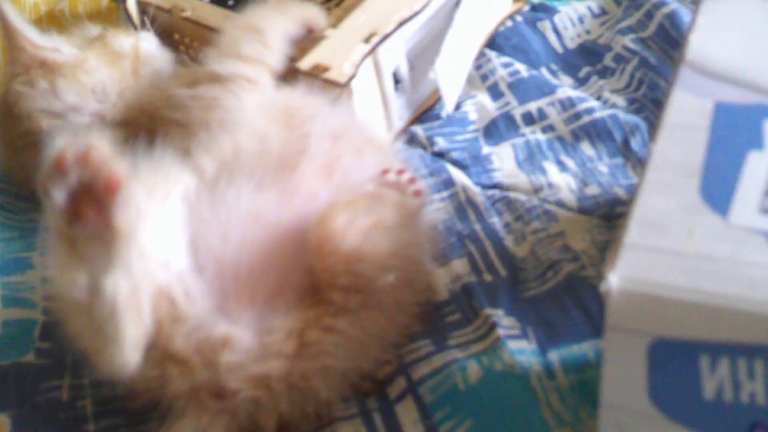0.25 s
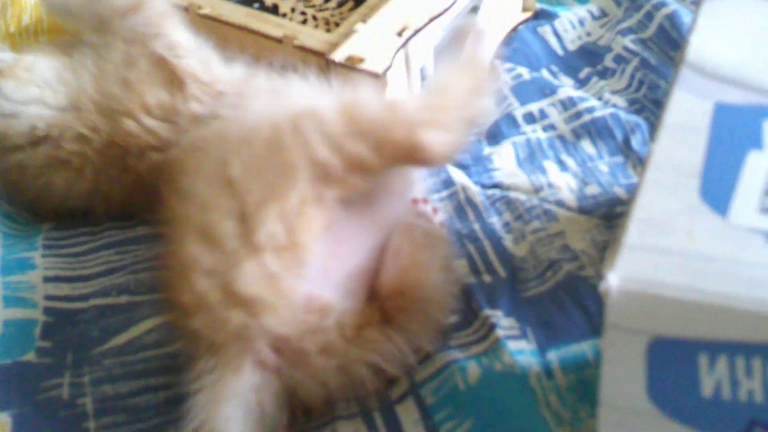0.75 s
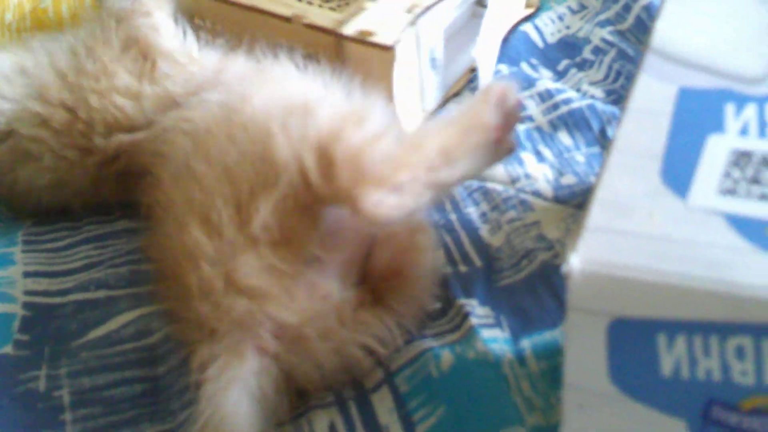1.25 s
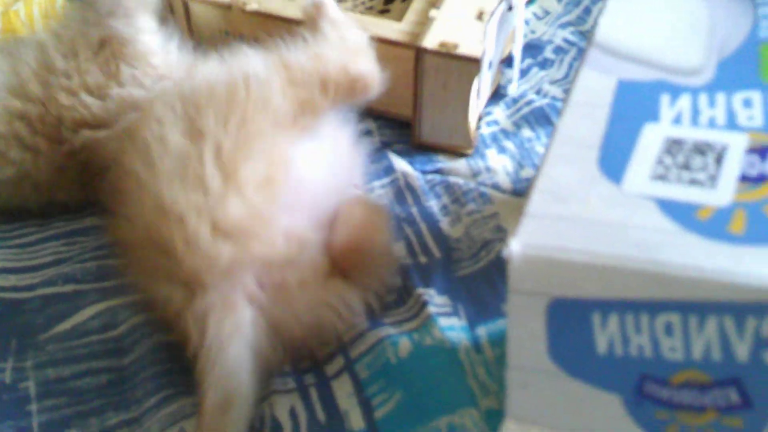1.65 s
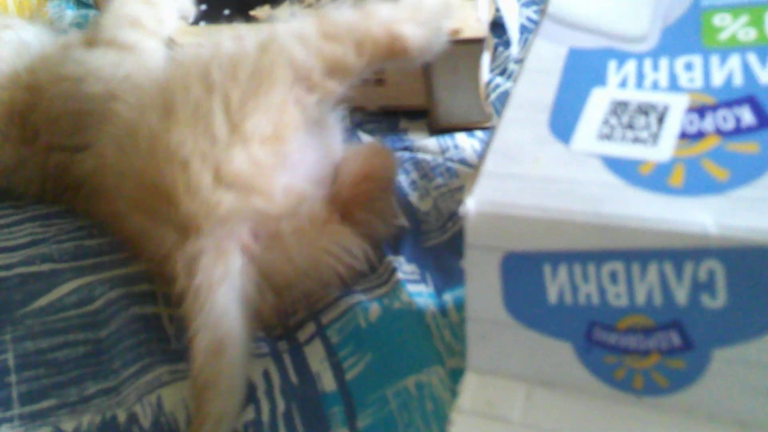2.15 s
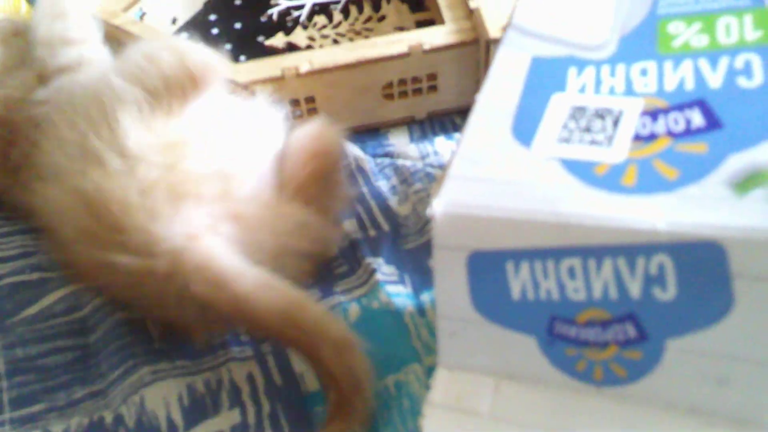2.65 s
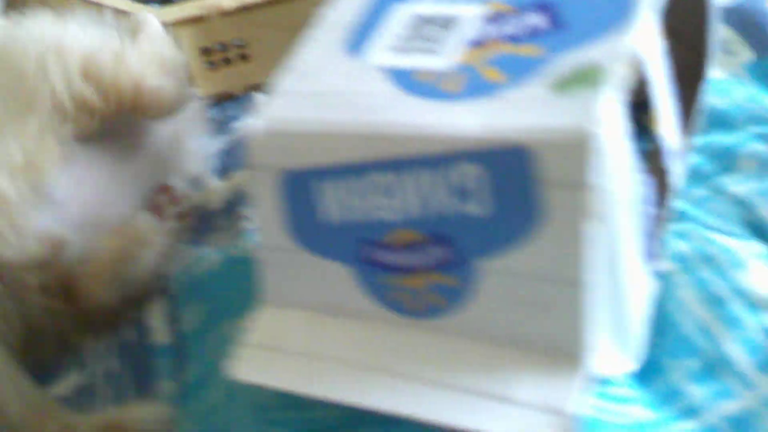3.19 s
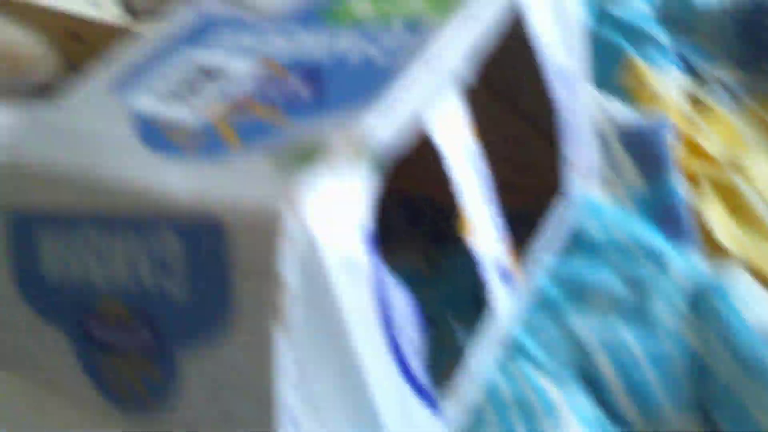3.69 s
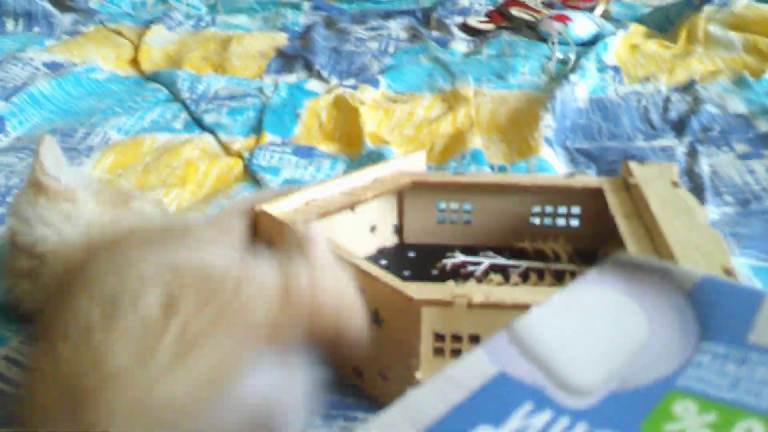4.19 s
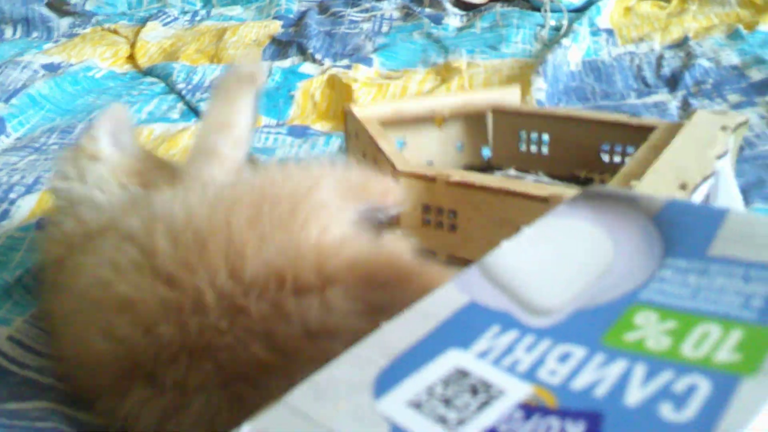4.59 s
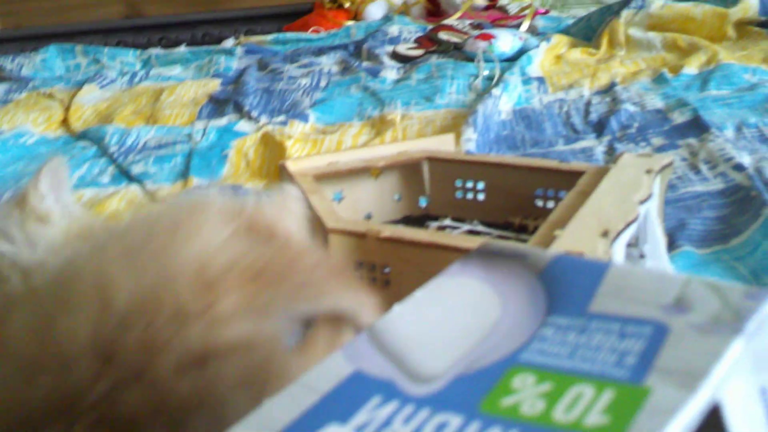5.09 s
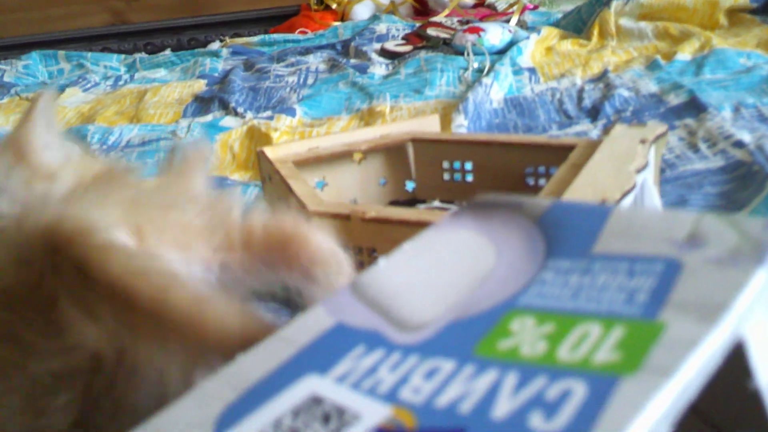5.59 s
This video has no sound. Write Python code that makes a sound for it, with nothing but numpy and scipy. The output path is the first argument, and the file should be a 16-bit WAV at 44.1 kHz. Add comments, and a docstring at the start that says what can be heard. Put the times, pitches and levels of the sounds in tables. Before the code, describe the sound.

A quiet room with soft, deep background noise and a steady electrical hum. From the start a kitten rubs against a small plywood box and paws at it: faint, irregular taps, drags and short scratches, each briefly ringing the thin panels with a slight room echo. Sharper claw ticks come at about 1.4, 1.6 and 2.5 seconds. After a short lull just past 3 seconds, a stronger scratch and snag lands at 3.7, and the hand-held microphone starts to rumble. Soft, dull thumps and light taps follow around 4.2 to 4.3, then a sharp claw tick at 4.6. At 5.0 and 5.1 two hard, very close knocks hit the microphone, the first the loudest sound, the second duller. Another scratch comes at 5.3. A faint, low, wavering drone swells near 4.9 and again from 5.4, easing toward the end at 5.8.

```python
"""First comes the hum of a quiet room and a faint rubbing: a kitten rolls on a blanket beside a carton.
It paws and scratches at a small plywood box. Paws land and drag, claws pull and snag, and each tiny
catch and slip makes the thin panels ring. Late on, the hand-held microphone is moved and thumped,
then knocked hard twice from very close, and a low drone swells at the end."""
import sys
import numpy as np
from scipy import signal
from scipy.fft import rfft, irfft
from scipy.io import wavfile

SR = 44100
rng = np.random.default_rng(int(sys.argv[2]) if len(sys.argv) > 2 else 0)


def int16_out(signal):
    """Quantize to a 16-bit WAV file."""
    q = np.round(np.clip(np.atleast_2d(signal).T, -1, 1) * 32767)
    wavfile.write(sys.argv[1], SR, q.astype(np.int16))


N = 257544
TIME = np.arange(N) / SR


def from_db(db):
    """Turn decibels into a number to multiply by."""
    return 10 ** (np.asarray(db) / 20)


def rms_one(x):
    """Scale a signal so its average size (rms) is 1."""
    return x / np.sqrt(np.mean(x ** 2) + 1e-20)


def level_curve(rows):
    """Join (time, dB) points into one gain for each sample."""
    times, db = np.transpose(rows)
    return from_db(np.interp(TIME, times, db))


def butter(x, hz, kind, order=2):
    """Keep the low pitches, or one band of them (a Butterworth filter)."""
    return signal.sosfilt(signal.butter(order, hz, kind, fs=SR, output="sos"), x + 1e-18)


def convolve(x, response):
    """Let every sample of x set off a copy of the response."""
    return signal.fftconvolve(x, response)[:N]


def click(s, height):
    """One sharp push at s seconds."""
    out = np.zeros(N)
    out[round(s * SR)] = height
    return out


def ring(hz, fade_s):
    """One tone of a struck object: a sine that falls 60 dB in fade_s."""
    t = TIME[:SR // 2]
    return np.sin(2 * np.pi * hz * t) * np.exp(-np.log(1000) * t / fade_s)


def swell(t, peak_s):
    """A curve that rises from time zero to 1 at peak_s, then dies away."""
    age = np.maximum(t, 0) / peak_s
    return age * np.exp(1 - age)


def wavering(hz, wander):
    """A sine of rms 1 that slowly drifts ahead of and behind its beat."""
    drift = rms_one(butter(rng.standard_normal(N), 2.7, "low"))
    return np.sqrt(2) * np.sin(2 * np.pi * (hz * TIME + rng.random()) + wander * drift)


# The still room's noise, from low to high: f/Hz, relative level/dB
ROOM_NOISE = [(15, 5), (30, 8), (70, -2.5), (140, -6), (220, -9.5), (450, -14), (780, -17), (1100, -27.5),
              (2350, -31.5), (3300, -40), (4900, -54.5), (6200, -48.5), (7500, -43.5), (8800, -59)]
def room_noise(level_db):
    """Soft, steady noise, strongest in the deep bass."""
    hz, db = np.transpose(ROOM_NOISE)
    bins_hz = np.maximum(np.fft.rfftfreq(N, 1 / SR), 1)
    shape = from_db(np.interp(np.log(bins_hz), np.log(hz), db))
    noise = irfft(rfft(rng.standard_normal(N)) * shape, N)
    return from_db(level_db) * rms_one(noise)


# The tones of the hum: f/Hz, level/dB
HUM_TONES = [(49.3, -53), (147, -65.5), (197, -73.5), (246, -74)]
def mains_hum():
    """Mains power hums on one low note and a few of its overtones."""
    return sum(from_db(db) * wavering(hz, wander=0.087) for hz, db in HUM_TONES)


def grains(per_s, spread_db):
    """A surface catches and slips: tiny random pushes of uneven size, rms 1."""
    sizes = from_db(spread_db * np.minimum(rng.exponential(1, N), 4))
    signs = rng.choice([-1, 1], N)
    return rms_one(sizes * signs * (rng.random(N) < per_s / SR))


def slipping(per_s, spread_db, clump_hz=45.2, clump_db=2.5):
    """The slips bunch into uneven clumps, which sounds scratchy; rms 1."""
    clumps = rms_one(butter(rng.standard_normal(N), clump_hz, "low"))
    return rms_one(grains(per_s, spread_db) * from_db(clump_db * clumps))


# Fur and paws rubbing along the box: t/s, relative level/dB
RUBBING = [(0, -51), (.3, -57), (.88, -59), (1.02, -51.5), (1.15, -67), (1.42, -49.5), (1.48, -48),
           (1.58, -47), (1.72, -61), (1.85, -53), (2.0, -55), (2.3, -49), (2.6, -51.5), (3.1, -71.5),
           (3.62, -55), (4.45, -53.5), (5.1, -59), (5.84, -60)]
def fur_rubs(low_db, middle_db, high_db):
    """The kitten shifts against the box; faint slips push on its low, middle and high tones."""
    slips = level_curve(RUBBING) * slipping(per_s=3700, spread_db=3.5)
    return np.outer(from_db([low_db, middle_db, high_db]), slips)


# The tones of the plywood box: f/Hz, width/Hz (wider dies sooner), relative level/dB
BOX_TONES = [(380, 49, -7), (505.3, 30.4, 1.5), (607.6, 42, 1.5), (694, 119, -4.5), (792, 44, 1.5),
             (874, 43, -2.5), (1010, 200, -14.5), (1484, 77, -0.5), (1620, 120, -4.5), (1946, 160, -5.5),
             (2136, 95, -5.5), (2323, 150, -5), (2842, 236, -11.5), (3223, 270, -16), (3500, 110, -14),
             (3855, 380, -30), (4387, 110, -23), (4930, 1900, -38.5), (6380, 300, -32), (7100, 360, -28.5),
             (8050, 510, -34.5)]
def plywood_box(forces, low_top_hz=1200, middle_top_hz=3700):
    """Three forces ring the panels' low, middle and high tones; each group is scaled to equal energy."""
    groups = np.zeros((3, SR // 2))
    for k, (hz, width_hz, db) in enumerate(BOX_TONES):
        group = int(hz > low_top_hz) + int(hz > middle_top_hz)
        fade_s = np.log(1000) / (np.pi * width_hz)
        groups[group] += (-1) ** k * width_hz * from_db(db) * ring(hz, fade_s)
    return sum(convolve(force, tones / np.linalg.norm(tones)) for force, tones in zip(forces, groups))


def contact(force, hardness_db, sharp_db, spot_hz, narrowness):
    """Split a touch in three: the soft pad drives the low tones, the claw the middle, its tip the high."""
    favour, tip_db = 3.0, -17.5
    # The spot touched favours tones near spot_hz, more narrowly for a point than for a drag.
    b, a = signal.iirpeak(spot_hz, narrowness, fs=SR)
    claw = (force + favour * signal.lfilter(b, a, force + 1e-18)) / np.sqrt(1 + favour)
    pad = from_db(-hardness_db) * force
    tip = from_db(tip_db + sharp_db) * claw
    return np.array([pad, claw, tip])


# Paws landing on the box: t/s, relative level/dB, hardness/dB (claw over pad), click sharpness/dB,
# time to the hardest drag/s, f/Hz favoured by the spot
PAW_LANDINGS = [(0.1816, -58.5, -7.5, 1.5, 0.0064, 1750), (0.906, -53, 6.5, 2.5, 0.025, 2960),
                (1.045, -64.5, -0.5, 5, 0.012, 1730), (1.168, -59, 1, 3, 0.037, 2510),
                (1.4485, -64, -5, 9.5, .028, 2590), (1.744, -52.5, -4, 2.5, .025, 2900),
                (1.936, -57.5, -2.5, -0.5, 0.012, 2200), (2.038, -59.5, -4, 1.5, 0.003, 2560),
                (2.148, -60, -10.5, 1.5, 0.015, 2200), (2.3635, -66.5, -16, -2.5, 0.0046, 2240),
                (2.745, -68.5, -8, 1.5, 0.0056, 2330), (2.859, -63, -14, 1.5, 0.017, 1550),
                (3.809, -67.5, 0, 6, 0.013, 2850), (4.157, -75, -19.5, 2, 0.012, 1450),
                (4.326, -61, -8, -0.5, 0.039, 3070), (4.481, -61, -3, -3, 0.0091, 1610),
                (4.558, -53, 1, -5, 0.013, 3100), (4.636, -72, -16, 1.5, 0.0045, 1490),
                (4.772, -59.5, -5.5, -5.5, 0.0083, 3000), (5.299, -57.5, 4.5, 0, 0.026, 3550),
                (5.457, -59.5, -4, -0.5, 0.019, 3560)]
def paws_land(click_db, skid_s, skid_db, drag_db, claw_first_db):
    """The claw lands first with a click and a short skid; then the pad's drag swells and fades."""
    drag_focus = 1.64  # higher makes the drag shorter around its hardest moment
    slips = slipping(per_s=3000, spread_db=4.5)
    forces, t = np.zeros((3, N)), TIME[:SR // 4]
    for s, db, hardness_db, sharp_db, drag_s, hz in PAW_LANDINGS:
        span = slice(round(s * SR), round(s * SR) + len(t))
        landing = slips[span] * from_db(skid_db) * np.exp(-t / skid_s)
        landing[0] = from_db(click_db)
        landing = contact(landing, hardness_db + claw_first_db, sharp_db, hz, narrowness=8.1)
        drag = slips[span] * swell(t, drag_s) ** drag_focus
        drag = contact(drag, hardness_db, sharp_db, hz, narrowness=4.8)
        forces[:, span] += from_db(db + sharp_db) * landing + from_db(db + drag_db) * drag
    return forces


# Hooked claws pulling: t/s of letting go, relative level/dB, hardness/dB, click sharpness/dB,
# build-up/s, f/Hz favoured by the spot
CLAW_PULLS = [(0.404, -56.5, 3, -4, 0.042, 7000), (2.411, -53.5, 0.5, -2.5, 0.02, 4450),
              (2.675, -62.5, -9, -13, 0.068, 1660), (2.918, -53.5, 6, -1, 0.034, 2830),
              (3.663, -45, 0.5, -4, 0.035, 4460), (3.885, -62, -5, -5.5, .04, 1850),
              (4.061, -58.5, 8.5, 3.5, 0.041, 2160), (4.245, -61.5, -12.5, -12.5, 0.046, 1770),
              (5.328, -45, 2, -9, 0.019, 1990)]
def claws_pull(click_db, slip_db, release_s):
    """The slips grow as the claw pulls harder, until it clicks free; then they stop quickly."""
    slips = from_db(slip_db) * slipping(per_s=2900, spread_db=4.0)
    forces, reach = np.zeros((3, N)), SR // 4
    for s, db, hardness_db, sharp_db, build_s, hz in CLAW_PULLS:
        span = slice(round(s * SR) - reach, round(s * SR) + reach)
        t = TIME[span] - s
        pull = slips[span] * np.exp(-np.abs(t) / np.where(t < 0, build_s, release_s))
        pull[reach] = from_db(click_db + sharp_db)
        forces[:, span] += from_db(db) * contact(pull, hardness_db, sharp_db, hz, narrowness=9.2)
    return forces


# A claw snags and lets go with a pitched tick: t/s, relative level/dB, f/Hz
CLAW_SNAGS = [(1.448, -39, 2700), (1.623, -43, 1940), (2.5126, -39, 2346), (3.656, -34.5, 2805),
              (3.8109, -49, 2000), (4.0528, -38, 1840), (4.558, -32.5, 2044), (4.7708, -44.5, 1986),
              (5.3253, -41, 2100)]
def claws_snag(gain_db, chatter_db, chatter_s, fade_s):
    """A plucked edge rings briefly while the claw chatters off it."""
    chatter = from_db(chatter_db) * grains(per_s=1300, spread_db=5.5)
    out, length, band_ratio = np.zeros(N), SR // 5, 1.25
    for s, db, hz in CLAW_SNAGS:
        span = slice(round(s * SR), round(s * SR) + length)
        pluck = chatter[span] * np.exp(-TIME[:length] / chatter_s)
        pluck[0] = 1
        pluck = butter(pluck, [hz / band_ratio, hz * band_ratio], "band")
        out[span] += from_db(db + gain_db) * convolve(pluck, ring(hz, fade_s))[:length]
    return out


def smear(x, hz, width_hz):
    """Waves near one pitch arrive late, which spreads out a blow's first peak (an all-pass filter)."""
    radius = np.exp(-np.pi * width_hz / SR)
    a = np.array([1, -2 * radius * np.cos(2 * np.pi * hz / SR), radius * radius])
    return signal.lfilter(a[::-1], a, x + 1e-18)


# The rumble of the moving hand: t/s, level/dB
HAND_RUMBLE = [(0, -80), (3.6, -58.5), (4.9, -57.5), (5.84, -63)]
# Soft thumps of the hand: t/s, relative level/dB, f/Hz above which the thump is dulled
HAND_THUMPS = [(4.173, -32.5, 114), (4.29, -26, 455)]
# The dull tones of the grip: f/Hz, relative level/dB, fade time/s
GRIP_TONES = [(72.5, -12, 0.03), (131, 1, 0.075), (243, 3, 0.014), (412, -4.5, 0.018)]
def hand_on_microphone(rumble_band_hz, stir_db, stir_s):
    """The hand rumbles and thumps through its grip; each thump briefly stirs up more rumble."""
    rumble = rms_one(butter(rng.standard_normal(N), rumble_band_hz, "band"))
    stirred = sum(from_db(db + stir_db) * swell(TIME - s, stir_s) for s, db, _ in HAND_THUMPS)
    blows = sum(butter(click(s, from_db(db)), hz, "low", order=4) for s, db, hz in HAND_THUMPS)
    grip = sum(from_db(db) * ring(hz, fade_s) for hz, db, fade_s in GRIP_TONES)
    thumps = convolve(blows, smear(grip, hz=96, width_hz=160))
    return thumps + (level_curve(HAND_RUMBLE) + stirred) * rumble


# Two hard knocks and three light taps: t/s, relative level/dB, f/Hz above which the blow is dulled
MICROPHONE_KNOCKS = [(4.2001, -41.5, 2270), (4.2223, -34, 2130), (5.0228, -14.5, 3430), (5.134, -22, 1580),
                     (5.2820, -40.5, 1960)]
# The tones of the microphone's casing: f/Hz, relative level/dB, fade time/s
CASING_TONES = [(175, -51, 0.037), (365, -37, 0.0084), (594, -13.5, 0.037), (826, -10, 0.039),
                (1124, -1, 0.01), (1340, -3.5, 0.017), (1480, -7, 0.025), (2080, -16.5, 0.021),
                (2496, -11, 0.016), (2804, -14, 0.022), (3920, -20, 0.011), (5820, -6, 0.0021),
                (7350, -10.5, 0.01)]
def knocks_on_microphone(gain_db):
    """Each blow rings the casing; some sound bright, others dull."""
    blows = sum(butter(click(s, from_db(db + gain_db)), hz, "low", order=3)
                for s, db, hz in MICROPHONE_KNOCKS)
    casing = sum(from_db(db) * ring(hz, fade_s) for hz, db, fade_s in CASING_TONES)
    return convolve(blows, smear(casing, hz=1100, width_hz=300))


# The rise and fall of the drone: t/s, level/dB
DRONE_LEVELS = [(4.6, -74), (4.85, -55.5), (5.2, -70), (5.38, -51.5), (5.5, -57), (5.62, -55), (5.84, -60)]
def low_drone(hz):
    """One low, slightly wavering note that swells near the end."""
    return level_curve(DRONE_LEVELS) * wavering(hz, wander=0.23)


def room_echo(x, first_echo_s, fade_s, dull_above_hz):
    """Echoes off the walls build up, then fall 60 dB in fade_s."""
    t = TIME[:SR // 2]
    tail = rng.standard_normal(len(t)) * from_db(-60 * t / fade_s)
    build_up = 1 - np.exp(-(t / first_echo_s) ** 2)
    tail = butter(tail * build_up, dull_above_hz, "low", order=1)
    return convolve(x, tail / np.linalg.norm(tail))


def scene():
    """The kitten's play echoes in the room; the close thumps and knocks hardly echo at all."""
    forces = (paws_land(click_db=27, skid_s=0.0053, skid_db=2.5, drag_db=-0.5, claw_first_db=4)
              + claws_pull(click_db=27, slip_db=1.0, release_s=0.009)
              + fur_rubs(low_db=-9.5, middle_db=-18, high_db=-36.5))
    kitten = plywood_box(forces) + claws_snag(gain_db=3.0, chatter_db=-37, chatter_s=0.01, fade_s=0.017)
    close = hand_on_microphone(rumble_band_hz=[51.5, 205], stir_db=-20, stir_s=0.016)
    close += knocks_on_microphone(gain_db=-3.0)
    into_room = from_db(-12.5) * kitten + from_db(-38.5) * close
    echo = room_echo(into_room, first_echo_s=0.0057, fade_s=0.2, dull_above_hz=7700)
    background = room_noise(level_db=-53) + mains_hum() + low_drone(hz=165)
    return (kitten + close + echo + background)[None]


def record(dry, cutoff_hz=8600):
    """The microphone steeply cuts off the highest treble."""
    return signal.sosfilt(signal.ellip(10, .2, 70, cutoff_hz, fs=SR, output="sos"), dry)


dry = scene()
out = record(dry)
int16_out(out)
```